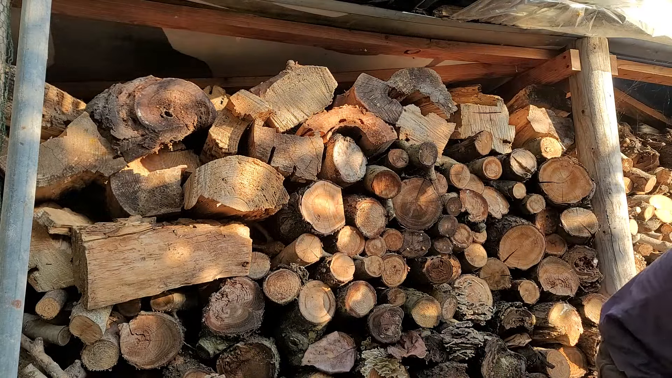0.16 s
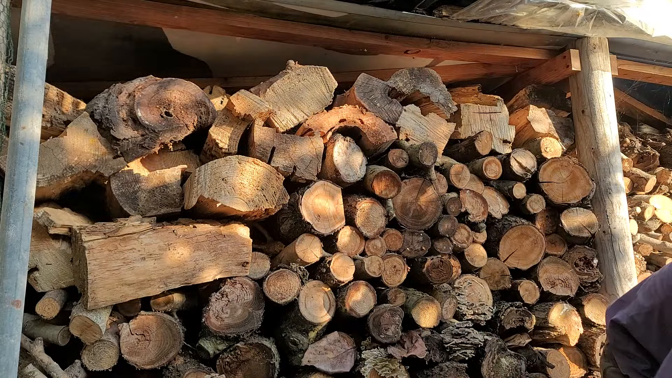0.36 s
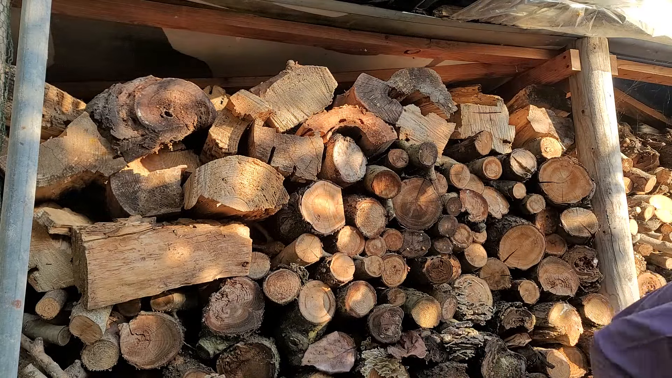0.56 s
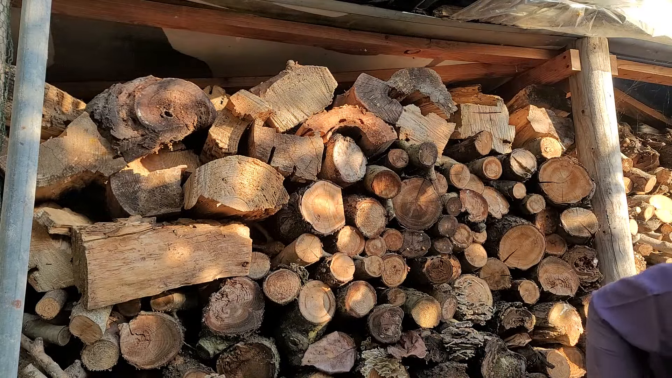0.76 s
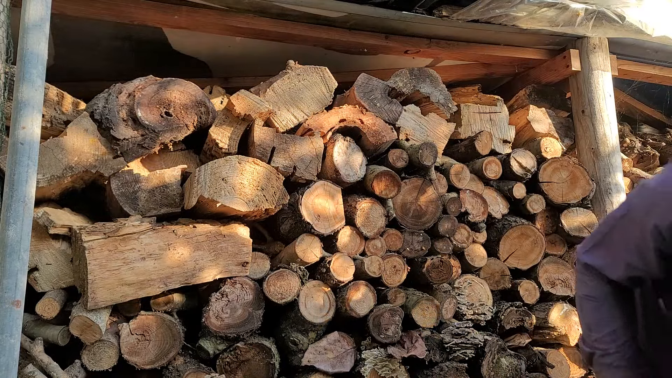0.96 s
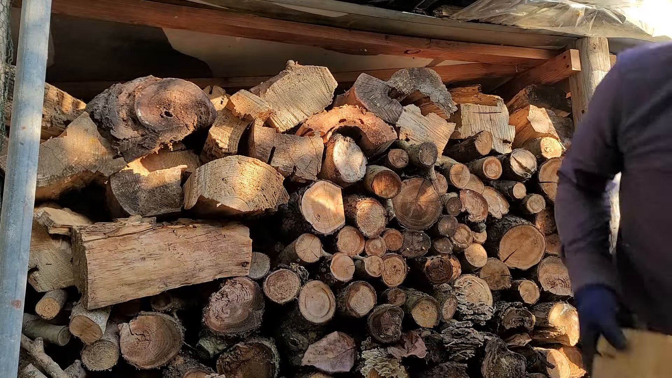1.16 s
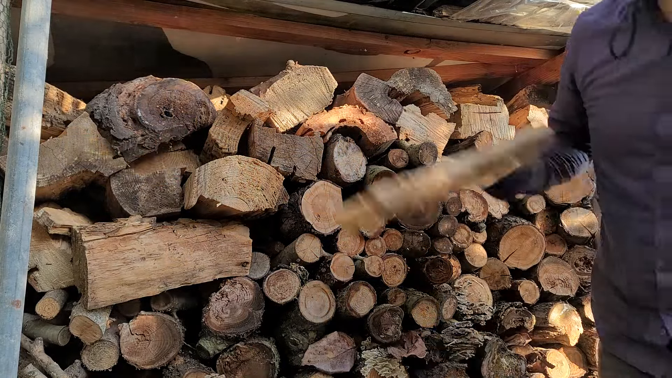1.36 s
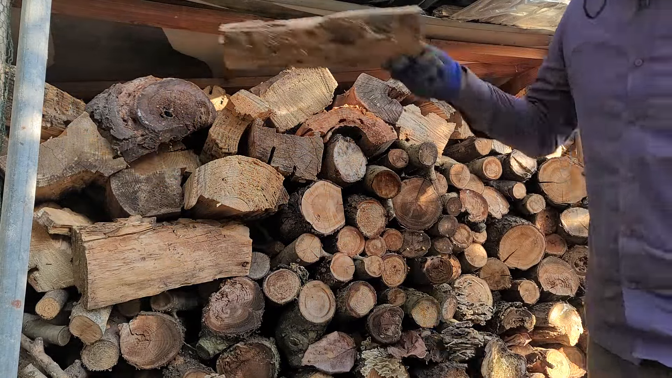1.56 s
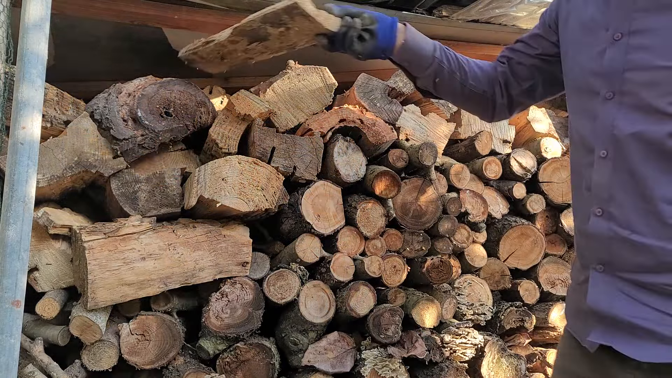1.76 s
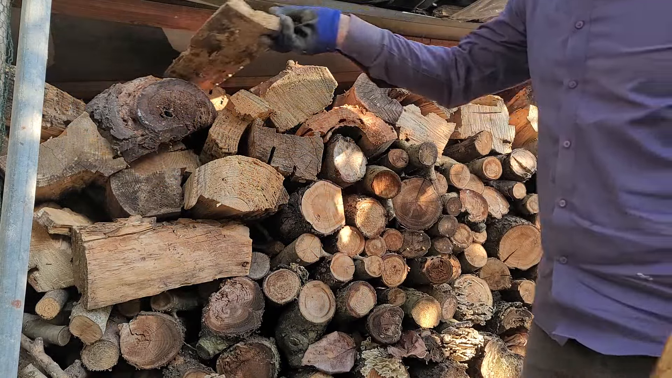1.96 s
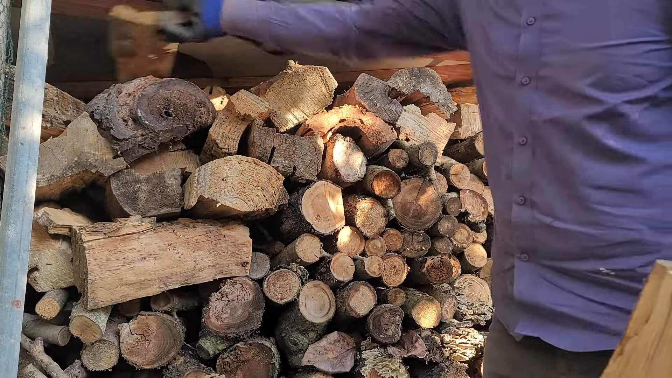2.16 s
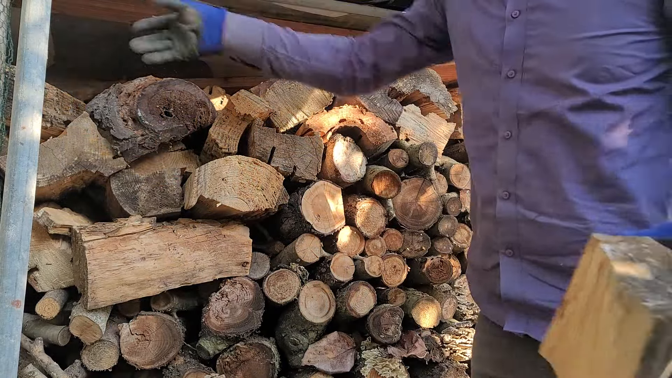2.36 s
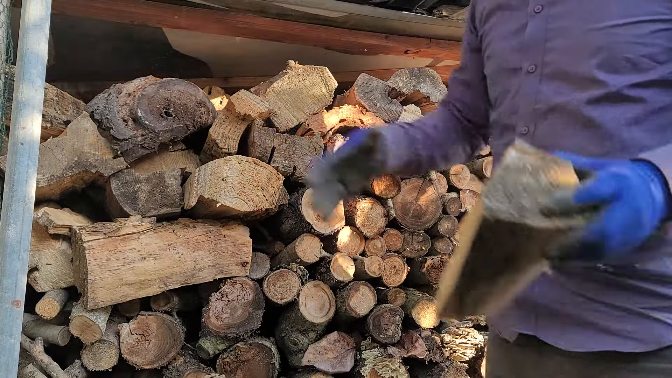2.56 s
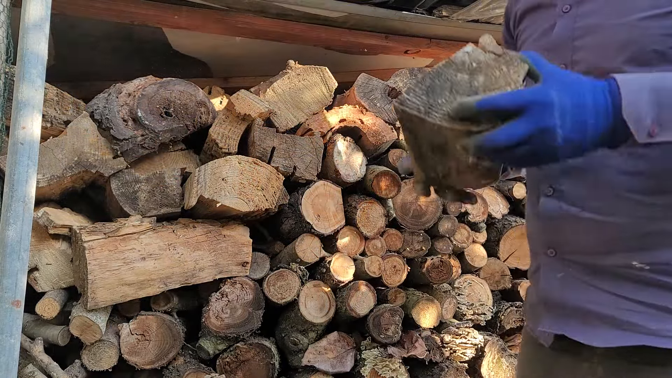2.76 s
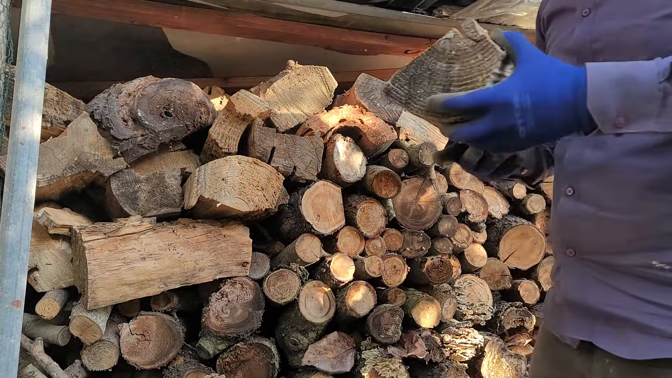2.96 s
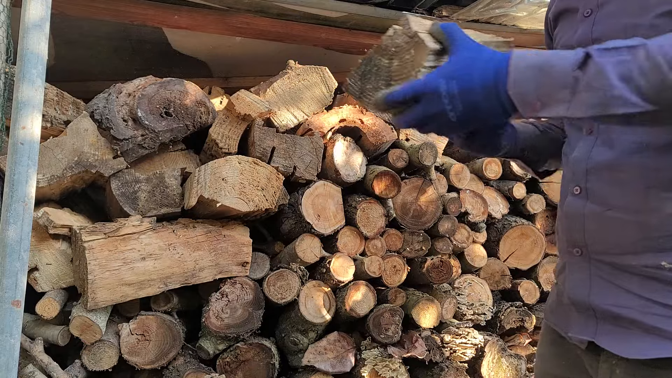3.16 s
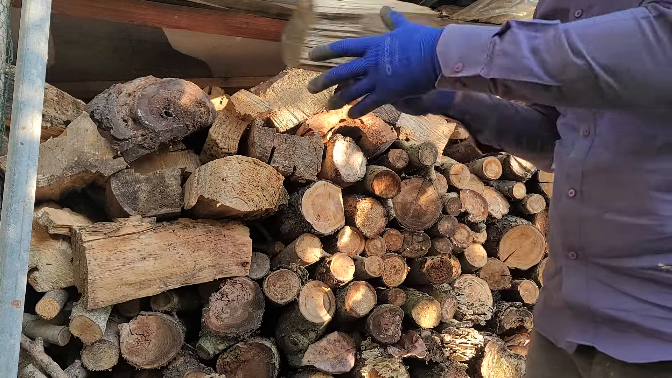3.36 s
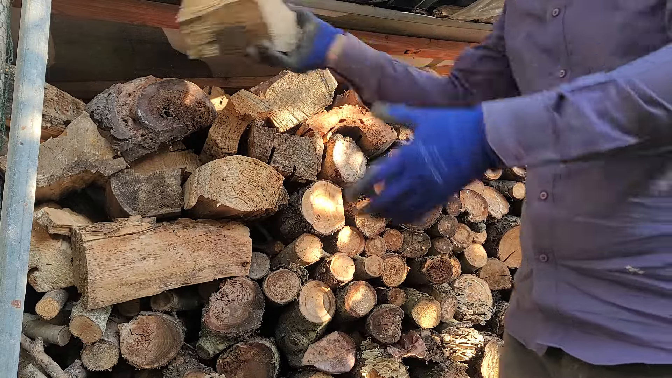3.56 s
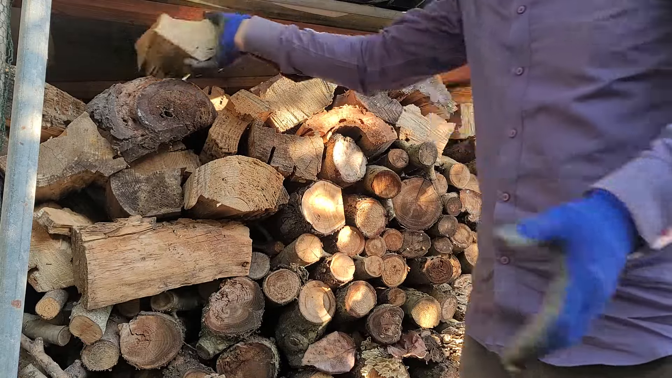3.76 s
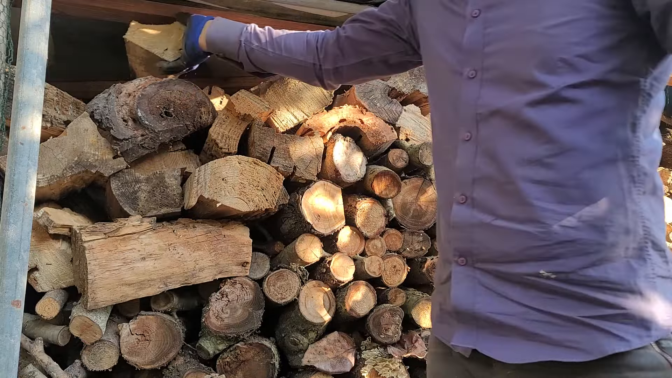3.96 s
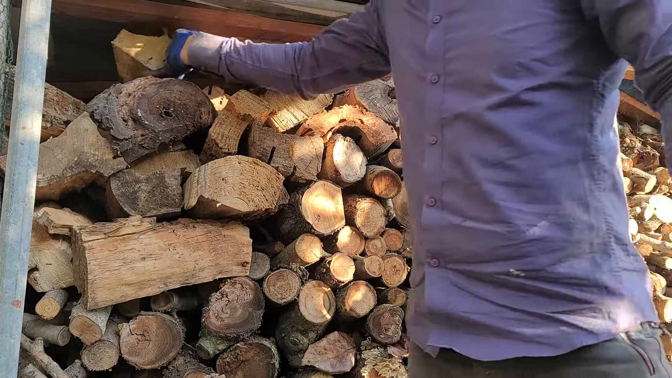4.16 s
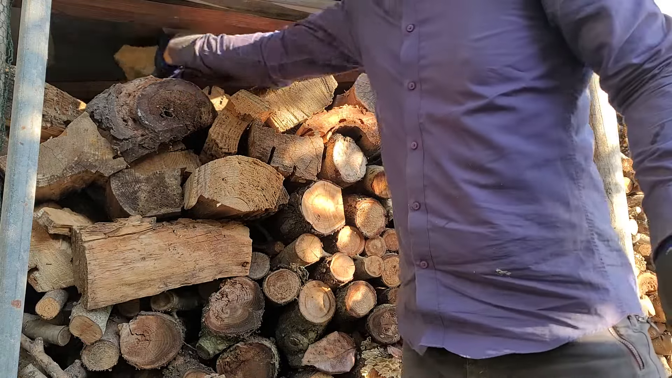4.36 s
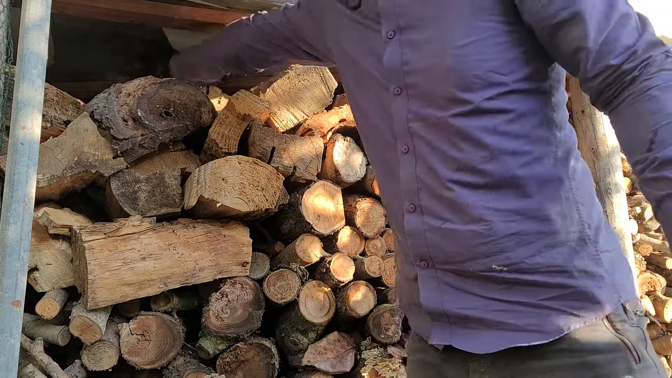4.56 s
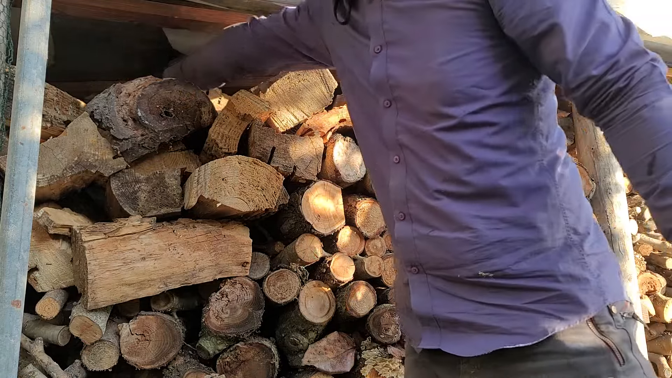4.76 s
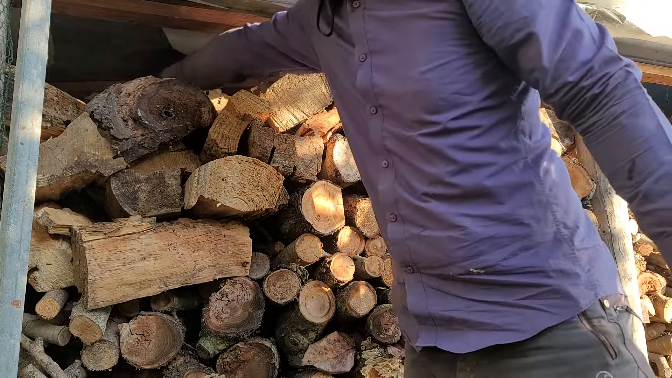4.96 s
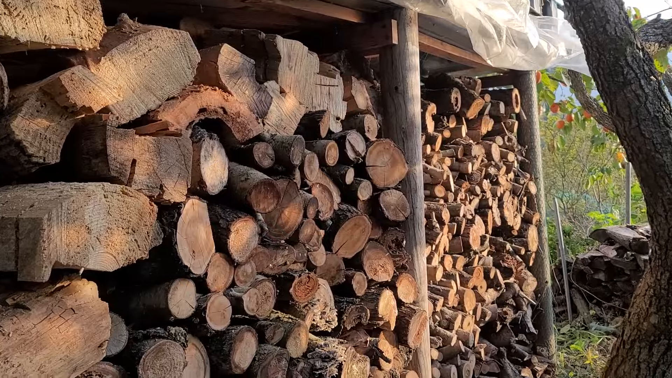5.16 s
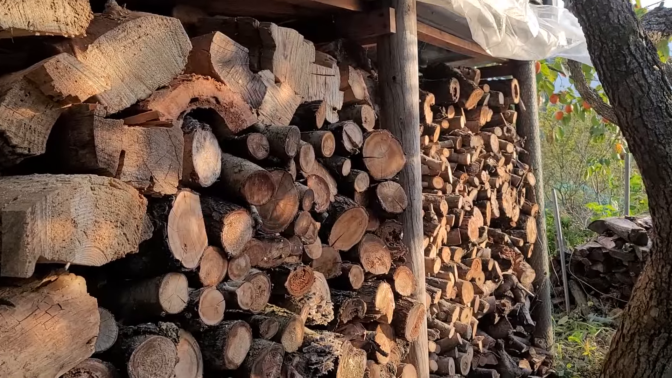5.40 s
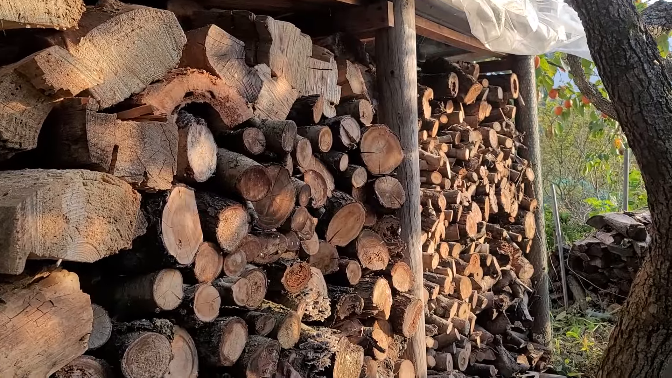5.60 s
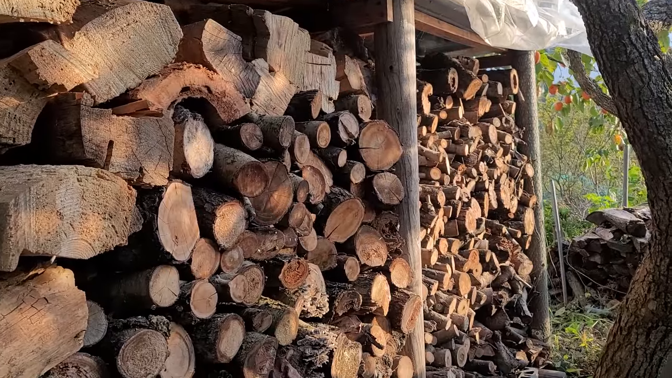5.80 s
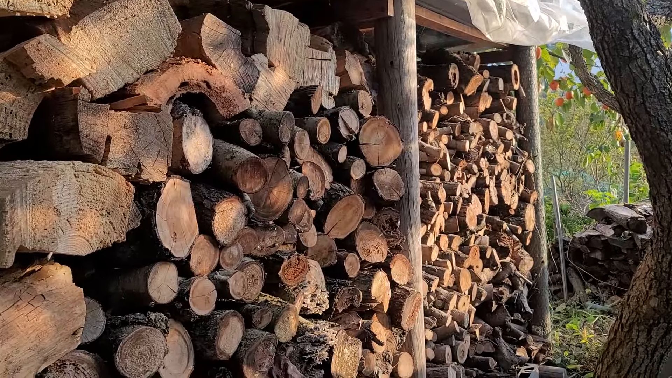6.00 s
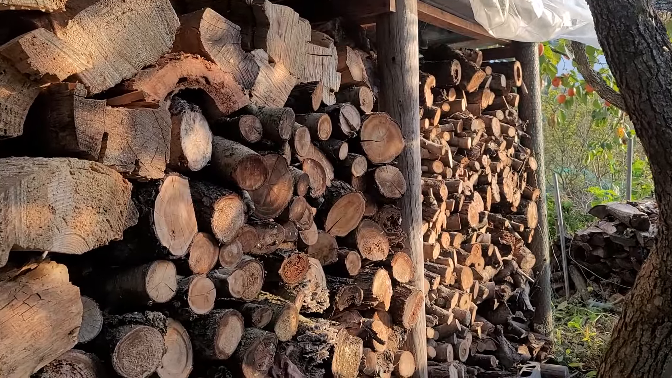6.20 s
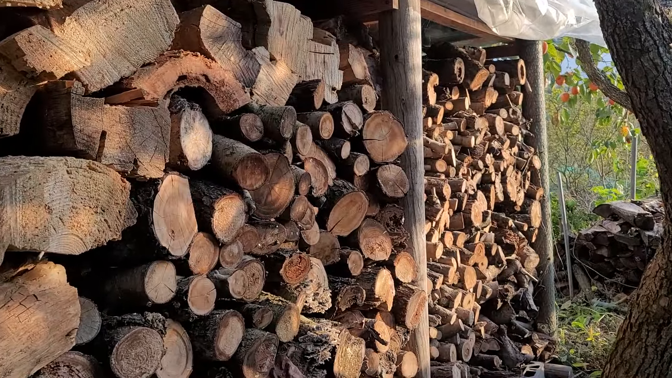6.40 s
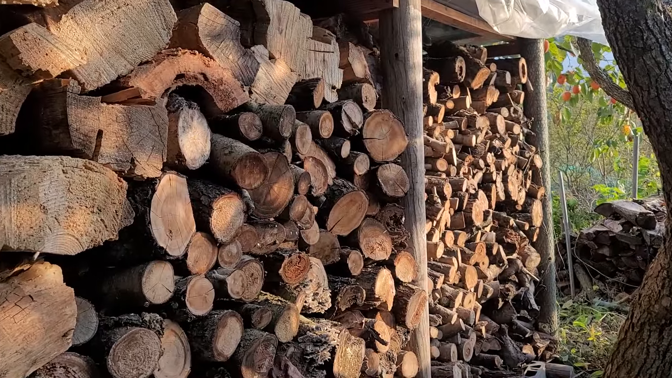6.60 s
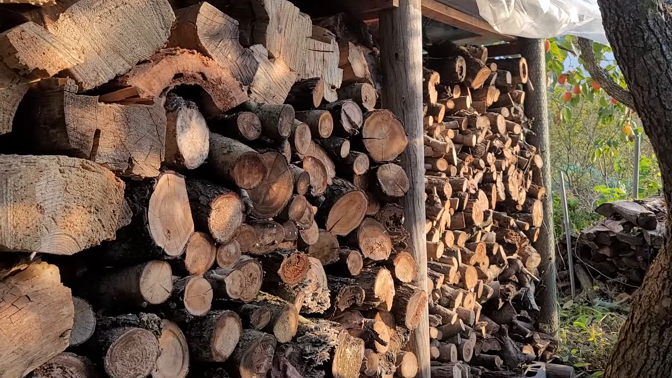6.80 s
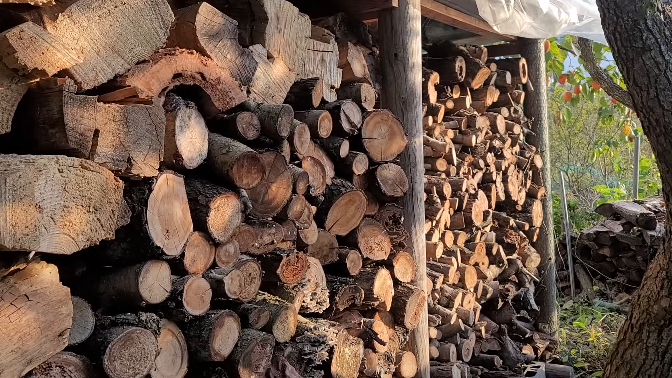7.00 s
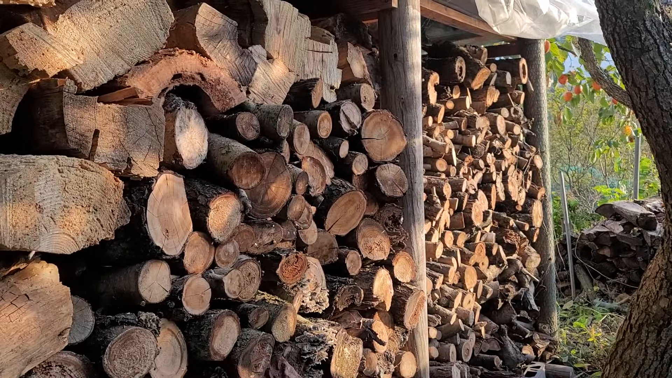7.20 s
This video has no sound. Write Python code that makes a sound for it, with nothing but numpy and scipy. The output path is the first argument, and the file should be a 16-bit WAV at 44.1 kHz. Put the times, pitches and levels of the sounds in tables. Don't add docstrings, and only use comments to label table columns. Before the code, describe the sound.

Close, wide stereo in an open woodshed, with short dry reflections. From 0 to 1.3 s there is only faint rubbing and sparse bark ticks, one sharper at 0.37. Small cracks come around 1.35, a light wooden bump at 1.57, then a rough scrape swelling from 1.75 to 2.2 with crisp snaps near 1.8 and 2.0. A firm, short knock lands at 2.35, followed by low rocking thuds to 2.9. Softer sliding and dry crackles run from 3.1 to 4.1, with a bright snap at 3.82. The loudest event, a heavy hollow clunk, hits at 4.53 and bounces at 4.65, settling by 4.95; a faint bird chirps at 4.73 and 4.82. At 5.06 the scene cuts to a quiet yard: soft low breeze puffs, settling leaf rustle, wavering distant motor hum, thin throbbing insects, sparse tiny ticks and a very faint chirp at 5.95, until about 7.2 s.

```python
import sys
import numpy as np
from scipy import signal
from scipy.fft import rfft, irfft, next_fast_len
from scipy.io import wavfile
from scipy.ndimage import uniform_filter1d, map_coordinates

SR = 44100
rng = np.random.default_rng(int(sys.argv[2]) if len(sys.argv) > 2 else 0)


def amplitude_ratio(level_db):
    exponent = np.asarray(level_db, float) / 20
    return 10 ** exponent


def generate_wav(sig):
    pcm = np.round(np.clip(np.atleast_2d(sig).T, -1, 1) * 32767).astype(np.int16)
    wavfile.write(sys.argv[1], SR, pcm)


N = 319284
T = np.arange(N) / SR
# end of work
# in s, start of quiet in s.
CUT_S = (5.055, 5.068)


def knocks():
    # start in seconds, peak in dB, ring in Hz, ring t60 in seconds, rattle in dB over the ring.
    first_log = [(1.57, -28, 172, 0.0035, -14.5), (1.577, -34.5, 112, 0.053, -15),
                 (1.688, -49.5, 400, 0.031, -3), (1.788, -38.5, 340, 0.014, -13),
                 (1.845, -43, 384, 0.047, -12), (1.889, -51, 224, .022, 7), (2.321, -46.5, 194, 0.034, 6),
                 (2.333, -46, 250, .03, 1), (2.352, -16, 283, 0.015, -21.5),
                 (2.3553, -21.5, 290, 0.0031, -16), (2.432, -39, 187, 0.073, -2.5),
                 (2.451, -30, 193, 0.1, -5.5), (2.464, -26, 188, 0.05, -11), (2.544, -43, 213, 0.042, -3.5),
                 (2.584, -43.5, 158, 0.066, -7), (2.657, -28, 193, 0.05, -15), (2.679, -37, 107, 0.059, -5),
                 (2.699, -40, 109, 0.036, -4), (2.886, -46.5, 173, .03, 2),
                 (2.893, -36.5, 178, 0.034, -9.5), (2.903, -34, 184.3, 0.2, -9.5)]
    second_log = [(4.064, -34.5, 200, 0.033, -12), (4.08, -45, 142, .054, -10),
                  (4.519, -34.5, 120, 0.083, -7), (4.5265, -12, 255, 0.014, -11),
                  (4.536, -11.5, 165, 0.007, -11), (4.548, -17, 288, 0.049, -7.5),
                  (4.564, -29, 480, 0.023, -3), (4.58, -31, 250, .015, -11), (4.593, -34, 200, .02, -6.5),
                  (4.607, -37.5, 179, 0.02, -5.5), (4.6496, -17.5, 348, 0.0059, -21),
                  (4.656, -32, 390, 0.026, -18), (4.691, -27, 264, 0.021, -15.5), (4.7, -28, 333, .02, -22),
                  (4.712, -32.5, 239, 0.035, -17.5), (4.788, -36.5, 108, 0.04, -12.5),
                  (4.9, -36, 205, 0.032, -14)]
    # frequency in Hz, level in dB, t60 in seconds.
    pile_modes = [(184.3, -28.5, 0.238), (323, -22.5, 0.039), (554.5, -21.5, 0.041), (730, -42, 0.04),
                  (1020, -35, 0.029), (1532, -34, 0.04)]
    clatter_db, crack_db = 1.5, 2
    out, t = np.zeros(N), np.arange(SR // 4) / SR
    for s, db, hz, t60, rattle_db in first_log + second_log:
        push = -np.sin(2 * np.pi * np.clip(t * hz * 1.235, 0, 1))
        log = ring(push, hz, t60) + .5 * ring(push, 2.03 * hz, 0.27 * t60)
        add(out, s, log, db - 3.0)
        chance = rng.standard_normal((2, len(t))) * np.clip(t / 0.0034, 0, 1)
        clatter = band(chance[0] * np.exp(-t / 0.011), 300, 700)
        crack = band(chance[1] * np.exp(-t / 0.0065), 1140, 3300)
        add(out, s, clatter, db + rattle_db + clatter_db)
        add(out, s, crack, db + rattle_db + crack_db)
    pile = sum(amplitude_ratio(db) * hz / SR * 2 * np.pi * ring(out, hz, t60) for hz, db, t60 in pile_modes)
    return out + pile


def tocks():
    # start in seconds, peak in dB, mode in Hz, t60 in seconds.
    edge_modes = [(.3738, -52, 1785, 0.016), (.3738, -43.5, 2920, 0.026), (0.3737, -37, 5700, .015),
                  (.3738, -46, 7260, .012), (.329, -54, 6100, .012), (0.442, -55, 6060, .012),
                  (1.388, -40, 7250, .012), (1.574, -38.5, 1420, 0.045), (1.578, -52, 800, 0.056),
                  (2.355, -38, 1176, .025), (2.456, -44, 653, .03), (2.893, -41, 896, 0.036),
                  (2.902, -49, 740, .04), (2.898, -44, 2070, .03), (3.8163, -31, 1990, 0.016),
                  (3.818, -41, 4420, .015), (3.864, -61, 1880, .03), (3.871, -59, 1810, .03),
                  (2.757, -45, 1580, .02), (2.582, -48, 2500, .015), (2.581, -52, 3370, .015),
                  (4.525, -34, 1300, .02), (4.537, -33, 5100, .012), (4.538, -33, 3100, .012),
                  (4.649, -30.5, 970, 0.023), (4.652, -49, 2250, .03), (4.658, -49, 1430, .1),
                  (4.825, -59, 1800, .012), (4.908, -56, 1890, .012)]
    push_cycles = 3.5
    out, t = np.zeros(N), np.arange(SR // 8) / SR
    for s, db, hz, t60 in edge_modes:
        chatter = np.sin(2 * np.pi * hz * np.minimum(t, push_cycles / hz)) * (t * hz < push_cycles)
        add(out, s, ring(chatter, hz, t60), db)
    return out


def snaps():
    # start in seconds, peak in dB, flake pitch in Hz, fine dust in dB over the peak.
    first_bark = [(.1296, -64, 6960, -16), (0.1892, -43.5, 4560, -8), (0.33, -44, 4400, -20),
                  (0.3739, -32.5, 1826, -9.5), (0.4418, -48, 4760, -19), (.5626, -60, 2380, -3),
                  (0.604, -41, 4570, -4), (0.632, -42, 4800, -7), (0.8845, -55, 2830, 2),
                  (.9931, -50, 6250, -15), (1.094, -40, 3300, -5.5), (1.202, -52.5, 5220, 1),
                  (1.3144, -46, 3840, -0.5), (1.3381, -33, 6330, -5.5), (1.362, -42, 5540, -3),
                  (1.3875, -40.5, 6950, 5.5), (1.5025, -51, 5000, -6), (1.7918, -25.5, 7600, -2.5),
                  (1.9955, -21, 4360, -2), (2.1362, -37, 4770, -26), (2.2437, -35, 6200, -14),
                  (2.43, -39.5, 5240, -6), (2.438, -39, 5130, -16), (2.448, -27, 5680, -23),
                  (2.5805, -36, 2350, -11), (2.754, -32, 2820, -15)]
    second_bark = [(3.094, -36, 2030, -23), (3.4268, -37, 3440, -12), (3.443, -35, 6530, -7),
                   (3.4954, -34.5, 5900, -6), (3.6228, -40, 5000, -8), (3.651, -43, 2200, -6),
                   (3.671, -54, 5500, 10), (3.686, -45, 4400, 2), (3.7038, -37.5, 4040, -3),
                   (3.72, -56, 5500, 0), (3.731, -37, 4950, -7), (3.7354, -32, 4800, -11.5),
                   (3.7788, -46, 5000, -6), (3.818, -27, 4200, -10.5), (3.8635, -50, 4500, -12),
                   (3.8785, -50, 5500, -5), (3.966, -57, 5000, 1), (4.0463, -40, 4630, 4.5),
                   (4.063, -44, 1920, -8), (4.0796, -56, 1880, 7), (4.1524, -47, 2450, -4),
                   (4.1664, -47, 6000, -6), (4.288, -51, 3000, -15), (4.5364, -19, 1980, -12),
                   (4.651, -42, 1530, -9), (4.7834, -40.5, 3000, -11), (4.789, -47, 3500, -9),
                   (4.9097, -70, 1700, -22)]
    twigs = [
        (5.482, -56, 1534, -0.5),
        (5.6175, -58, 2540, -3),
        (6.1664, -57, 5250, -33),
        (6.524, -60.5, 1560, -23),
        (6.741, -58.5, 5750, -10.5),
    ]
    out, t = np.zeros(N), np.arange(SR // 8) / SR
    for s, db, hz, dust_db in first_bark + second_bark + twigs:
        t60 = .005 + 8.0 / hz
        burst = rng.standard_normal((2, len(t))) * amplitude_ratio(-60 * t / t60) * np.clip(t / 0.0016, 0, 1)
        add(out, s, band(burst[0], 1460, 5800) + 0.067 * ring(burst[0], hz, 0.011), db - 1.0)
        add(out, s, band(np.diff(burst[1] ** 3), 5700, 16400), db + dust_db + 9.0)
    return out


def slide():
    # start in seconds, hold in seconds, level in dB,
    # fine dust in dB over it, coarse grit in dB over it.
    strokes = [(.33, 0.011, -57.5, -8, 1.5), (.595, 0.084, -54.5, -3.5, -0.5), (.7, 0.068, -55.5, -5.5, 1),
               (.78, 0.022, -60.5, -6, 0), (.575, 0.011, -64.5, -4, -5), (.86, .059, -61, -5, 1.5),
               (1.2, 0.031, -68, 1, -7), (1.31, 0.045, -53.5, -1, -2), (1.415, 0.018, -50, -7, 0),
               (1.48, 0.008, -56, -3, -1.5), (1.503, 0.071, -53.5, -4, 2), (1.6, 0.01, -54, -6.5, 0),
               (1.68, 0.037, -60, -3.5, -1.5), (1.74, 0.07, -49, 0.5, -1), (1.83, 0.096, -41, -0.5, -3),
               (1.97, 0.09, -35, -2.5, 0), (2.13, .03, -46.5, -4.5, -8), (2.18, 0.033, -43.5, -4, 0),
               (2.24, .09, -54, -5.5, -1), (2.35, 0.028, -50, -6, 1), (2.45, 0.019, -45, -7, -1.5),
               (2.51, 0.072, -58, -7.5, 6), (2.69, .12, -59.5, -4, 5), (2.89, 0.035, -55, -6.5, 2),
               (2.95, 0.15, -60.5, -5, -0.5), (3.105, 0.034, -44, -9, -1), (3.15, 0.24, -52, -4, -3),
               (3.44, 0.079, -52, -2, -5), (3.6, 0.17, -63, -2.5, -9), (3.8, 0.068, -58.5, -7.5, -1.5),
               (3.98, 0.073, -65, -4, 0), (4.1, .06, -62, -5.5, 4.5), (4.2, 0.068, -65, -9, -0.5),
               (4.535, .024, -41.5, -8, -3), (4.58, .16, -57, -6.5, -3), (4.97, 0.081, -63.5, -7.5, 0),
               (5.62, 0.028, -71, -1, -1.5)]
    # frequency in Hz, density in dB per Hz.
    grit_curve = [(590, -19), (1000, -0.5), (1360, 0.5), (1910, 2.5), (3200, 4), (3600, 2.5), (5100, 0),
                  (6330, -3.5), (8500, -39.5), (11000, -12), (18700, -120)]
    dust_curve = [(4120, -1.5), (7000, -2), (8140, -8.5), (15200, -6.5), (16300, -11), (16500, -38)]
    body_curve = [(88, -33), (150, -5.5), (425, 2), (505, 2.5), (1240, -6), (1370, 0), (2000, -3),
                  (2600, -38), (4400, -120)]
    fidget = amplitude_ratio(-69 + np.array([[0], [-3.5], [-1.5]])) * (T < CUT_S[0])
    grit, fine, coarse = np.hypot(swells(strokes, rise_db_s=590.5, fall_db_s=360.5), fidget)
    patches_db = 1.5 * walk(45) + 2.2 * walk(150)
    sizes = amplitude_ratio(3.8 * np.minimum(rng.exponential(size=(3, N)), 5.5) + patches_db)
    clicks, dust = rng.standard_normal((2, 3, N)) * sizes
    grain = colour(clicks, grit_curve)
    dull = (coarse / grit.clip(1e-9) * amplitude_ratio(1.4 * walk(40)) - 1) * band(grain, 1200, 3000)
    grain = grain + dull + (amplitude_ratio(2.385 * walk(40)) - 1) * band(grain, 3950, 7500)
    body_gain = amplitude_ratio(-14.0 + 19.7 * (T > CUT_S[1]))
    wood = grain + body_gain * colour(clicks[0], body_curve)
    return amplitude_ratio(-6.5) * (grit * wood + fine * amplitude_ratio(2.5) * colour(dust, dust_curve))


def shed(x, t60, damp):
    t = np.arange(SR // 2) / SR
    mid, side = rng.standard_normal((2, len(t))) * amplitude_ratio(-60 * t / t60) * np.clip(t / 0.0025, 0, 1)
    mid, side = band(mid, 390, 19845), band(side, 800, 19845)
    echo = signal.lfilter([1], [1, -damp], [mid + side, mid - side])
    echo = echo / np.sqrt(np.sum(echo ** 2) / 2)
    return signal.fftconvolve(x[None], echo, axes=1)[:, :N]


def rumble():
    # start in seconds, hold in seconds, level in dB, upper part in dB over it.
    shakes = [(1.38, 0.03, -57, 2), (1.574, 0.0068, -57, 10), (1.9, 0.12, -62, 17.5),
              (2.353, 0.015, -41, 5), (2.39, 0.062, -39, -4), (2.455, 0.027, -43, 14.5),
              (2.53, 0.065, -42.5, 3), (2.67, 0.019, -36, -3.5), (2.9, 0.035, -50, 12),
              (2.97, 0.068, -46, -4.5), (3.1, 0.13, -55, -5), (4.076, 0.017, -43.5, -1),
              (4.537, 0.01, -26.5, 6), (4.61, 0.075, -42, -4), (4.7, 0.042, -49, 11),
              (4.79, 0.022, -36.5, -7), (4.94, 0.016, -47, -10)]
    gusts = [
        (5.142, 0.13, -47, -24),
        (5.3, 0.055, -53, -25),
        (5.6, 0.02, -47.5, -6.5),
        (6.03, 0.025, -46.5, -10.5),
        (6.39, 0.034, -53.5, -5),
        (6.79, 0.049, -48.5, -24),
        (7.13, 0.012, -46, -13),
    ]
    still = T > CUT_S[1]
    lull = amplitude_ratio(np.where(still, -59, -61) + np.array([[0], [1]]))
    shaken = swells(shakes, rise_db_s=1497, fall_db_s=163.5)
    blown = swells(gusts, rise_db_s=147, fall_db_s=124)
    deep, high = np.hypot(np.hypot(shaken, blown), lull)
    low = wide([(15, -8.5), (30, -0.5), (60, 4.0), (105, -6), (140, -23.0)], 500) * amplitude_ratio(2.0 * walk(14))
    upper = wide([(90, -19.0), (125, -1.5), (200, -2.5), (300, -5.0), (420, -15.5)], 806)
    upper = upper * amplitude_ratio(1.46 * walk(25))
    lean = amplitude_ratio(np.array([[2.2], [-2.2]]) * still)
    return amplitude_ratio(-4.0) * (deep * lean * low + high * amplitude_ratio(-5.5) * upper)


def yard():
    # frequency in Hz, density in dB per Hz.
    work_curve = [(59, -29), (100, 12), (163, -16), (279, 0), (360, -1), (1050, -8.5), (1270, -14),
                  (6310, -40), (7980, -36), (15100, -25), (16500, -36)]
    still_curve = [(150, -19), (250, -10), (312, -10.5), (386, -8.5), (572, -7), (772, -11), (2500, -30.5),
                   (3250, -46), (5500, -120)]
    leaf_curve = [(1290, -45), (2200, -60), (2930, -8.5), (3300, -15.5), (4180, -3), (4820, -13),
                  (5900, -4.5), (6420, -4.5), (7860, -15.5), (9300, -25), (10600, -27), (11700, -22),
                  (16500, -29)]
    # frequency in Hz, level in dB rms.
    hum_tones = [(105, -66), (210, -66.5), (301, -76.5), (581, -78.5), (7569, -95)]
    still = T > CUT_S[1]
    lean = amplitude_ratio(np.array([[2.2], [-2.2]]))
    calm = amplitude_ratio(-64.5) * wide(still_curve, 350) + amplitude_ratio(-77.5) * wide(leaf_curve, 450)
    calm = calm + (amplitude_ratio(-3.0 * (T - 5.6)) - 1) * (T > 5.6) * band(calm, 1500, 3300)
    air = np.where(still, calm, amplitude_ratio(-64) * wide(work_curve, 450) / lean)
    hum = 0
    for hz, db in hum_tones:
        level = amplitude_ratio(db + 2.0 + 1.94 * walk(10))
        waver = 1 + 0.00593 * min(1, 300 / hz) * walk(3)
        hum = hum + level * tone(hz * waver)
    throb = .12 + np.clip(tone(23.2 + 0.41 * walk(1.33)), 0, 1)
    chirp_hz = np.interp(T, [5.5, 5.95], [6000, 5810]) + 90.0 * walk(300)
    insects = amplitude_ratio(-77.0 + 1.2 * walk(2.11)) * throb * .8 * tone(chirp_hz) * (T < 6.95)
    return air * amplitude_ratio(1.2 * walk(6.7)) + still * (hum + insects / lean)


def bird():
    # start in seconds, length in seconds, first pitch in Hz, last pitch in Hz, peak in dB.
    whistles = [
        (4.733, 0.033, 4350, 4740, -61),
        (4.822, 0.045, 4090, 4700, -64),
        (5.94, 0.05, 3500, 4350, -70),
        (5.973, .03, 4350, 4250, -66),
    ]
    out = np.zeros(N)
    for s, length, from_hz, to_hz, db in whistles:
        u = np.linspace(0, 1, int(length * SR))
        hoarse = 1 + 1.4 * uniform_filter1d(rng.standard_normal(len(u)), size=30)
        add(out, s, hoarse * np.sin(np.pi * u) * tone(from_hz + (to_hz - from_hz) * u), db)
    return out + amplitude_ratio(-3.0) * shed(out, t60=.3, damp=.05)


def tone(hz):
    return np.sin(2 * np.pi * np.cumsum(hz) / SR)


def ring(x, hz, t60):
    pole = np.exp(2j * np.pi * hz / SR - np.log(1000) / (t60 * SR))
    return signal.lfilter([1], [1, -pole], x).imag


def band(x, lo_hz, hi_hz):
    return signal.sosfilt(signal.butter(2, [lo_hz, hi_hz], "band", fs=SR, output="sos"), x)


def colour(x, points):
    n = next_fast_len(N)
    hz, db = np.transpose(points)
    log_hz = np.log(np.arange(n // 2 + 1) * SR / n + 1)
    gain = amplitude_ratio(np.interp(log_hz, np.log(hz), db, left=-90, right=-90))
    shaped = irfft(rfft(x, n) * gain, n)[..., :N]
    return shaped / np.sqrt(np.mean(shaped ** 2))


def wide(points, alike_hz):
    mid, side = rng.standard_normal((2, N))
    side = signal.lfilter(*signal.butter(1, alike_hz, "high", fs=SR), side)
    return colour(np.array([mid + side, mid - side]), points)


def walk(rate):
    k = int(SR / rate)
    held = np.repeat(rng.standard_normal(N // k + 1), k)
    return 1.3 * uniform_filter1d(uniform_filter1d(held, k), k)[:N]


def swells(rows, rise_db_s, fall_db_s):
    power = np.zeros((len(rows[0]) - 2, N))
    for s, hold, db, *over_db in rows:
        away_db = np.maximum(np.maximum((s - T) * rise_db_s, (T - s - hold) * fall_db_s), 0)
        heard = away_db < 60
        power[:, heard] += amplitude_ratio(2 * (db - away_db[heard])) * amplitude_ratio(2 * np.array([0, *over_db]))[:, None]
    return np.sqrt(power)


def add(track, s, sound, db):
    i = int(s * SR)
    sound = (sound / np.abs(sound).max())[:N - i]
    track[i:i + len(sound)] += sound * amplitude_ratio(db)


def scene():
    # time in seconds, delay of the left port in samples, left minus right in dB.
    places = [(0, 18, -3), (.7, 19.5, -4.5), (1.2, 14.5, -5), (1.7, 9.5, -3), (2.1, 7, -2.5),
              (2.3, -8.5, -1.5), (2.8, -13.5, -0.5), (3.1, 5, -2), (4.3, 8, -2.5), (4.5, -9, 0.5),
              (5.05, -12, -2), (5.07, 25, 0), (7.24, 12.5, -4)]
    rub, wood = slide(), knocks()
    near = .5 * wood + snaps() + tocks() + 0.66 * rub[0]
    place_s, *cues = np.transpose(places)
    lag, pan_db = [np.interp(T, place_s, cue) for cue in cues]
    at = np.arange(N)
    direct = np.array([map_coordinates(near, [at + shift], order=3) for shift in (-lag / 2, lag / 2)])
    direct = direct + 1.58 * rub[1:] + .5 * wood
    treble = band(direct, 1700, 16000)
    direct = direct + treble * (amplitude_ratio(np.array([pan_db, -pan_db]) * 0.87) - 1)
    scatter = shed(near - 0.045 * wood, t60=0.04, damp=0.069)
    mix = amplitude_ratio(1.5) * direct + amplitude_ratio(-0.5) * scatter + rumble() + yard() + amplitude_ratio(2.5) * bird()
    return mix * ((T < CUT_S[0]) | (T > CUT_S[1]))


def top_cut(x):
    return signal.sosfilt(signal.butter(12, 16600, fs=SR, output="sos"), x)


def record(dry):
    cut = signal.sosfilt(signal.ellip(8, .3, 30, 15800, fs=SR, output="sos"), dry)
    lean = amplitude_ratio(np.array([[-1.8], [1.8]]))
    cut = cut + (lean - 1) * band(cut, 12000, 19000)
    return top_cut(cut)


dry = scene()
out = record(dry)
generate_wav(out)
```